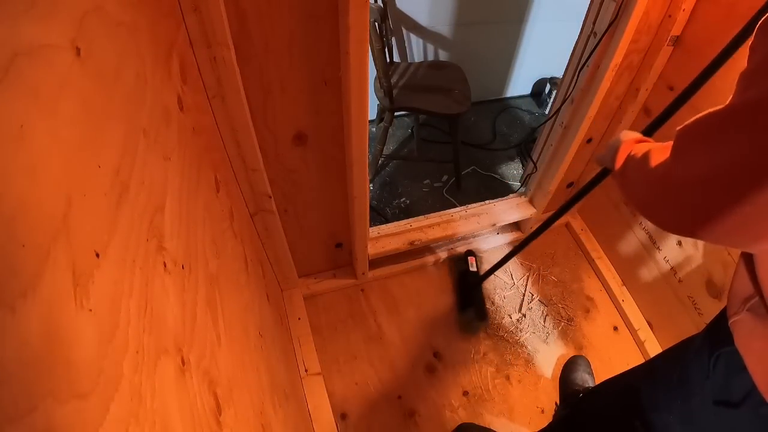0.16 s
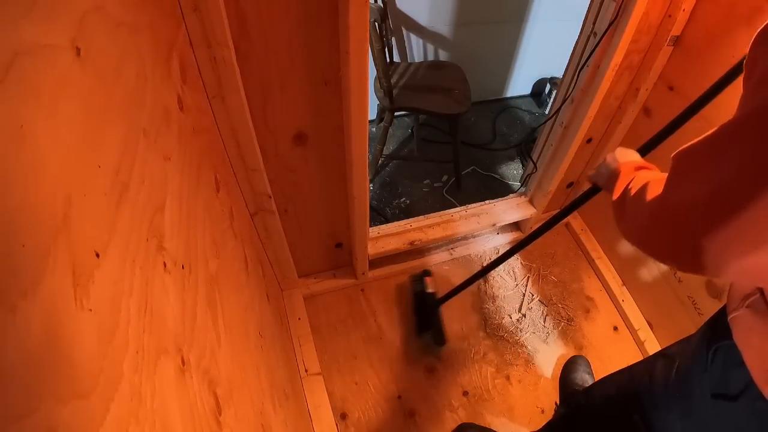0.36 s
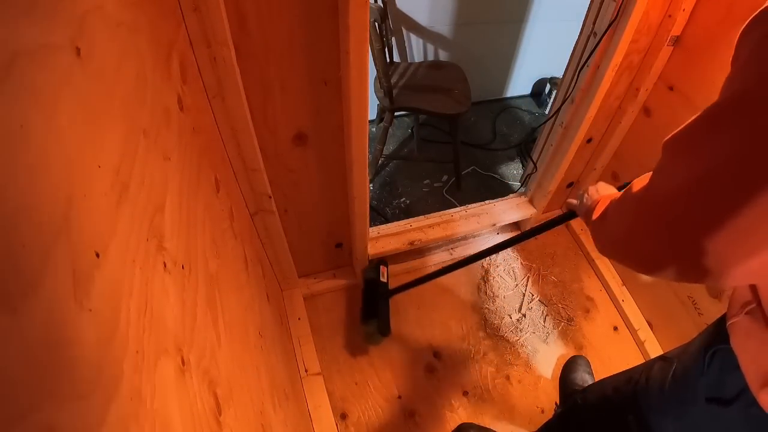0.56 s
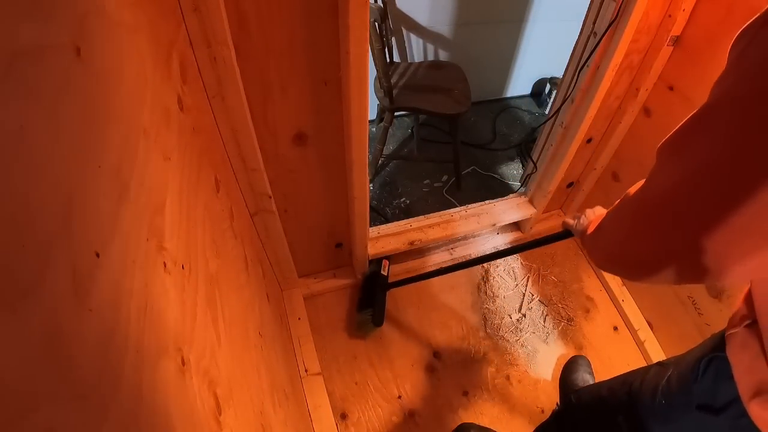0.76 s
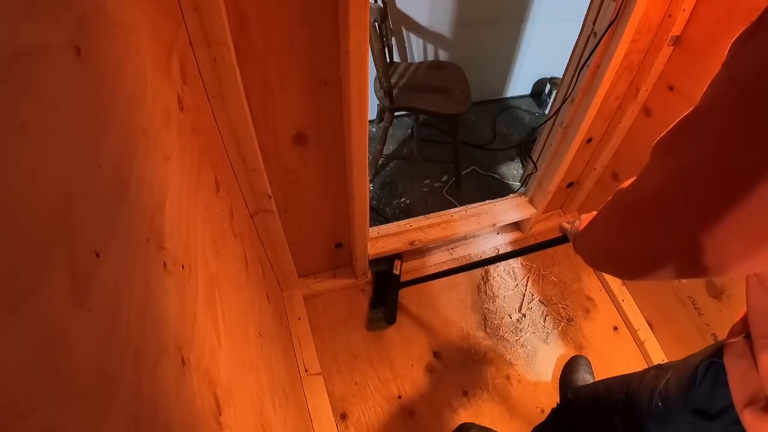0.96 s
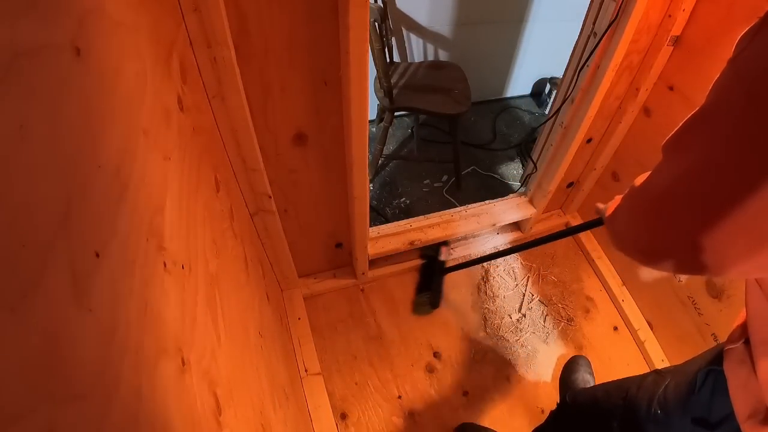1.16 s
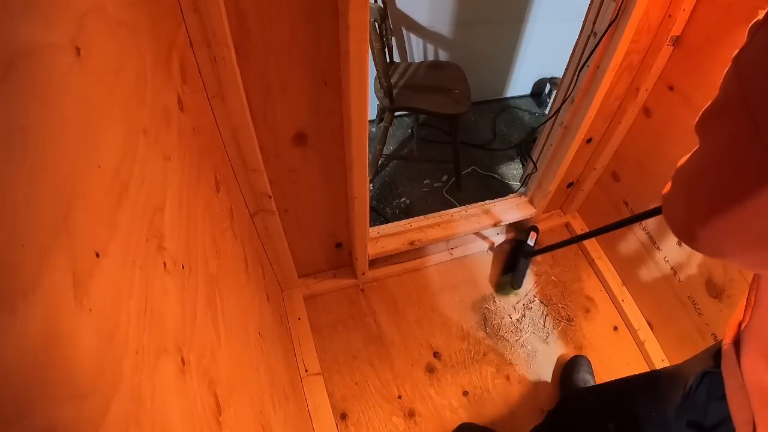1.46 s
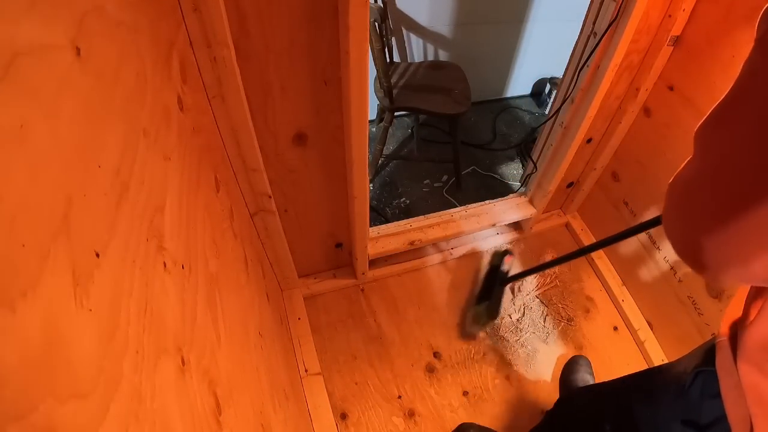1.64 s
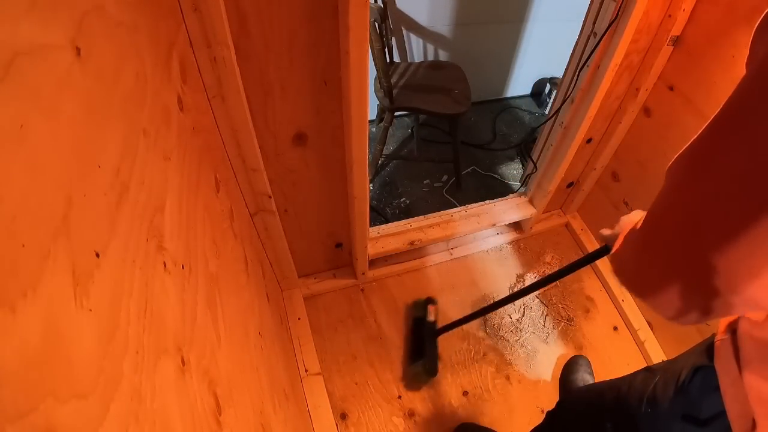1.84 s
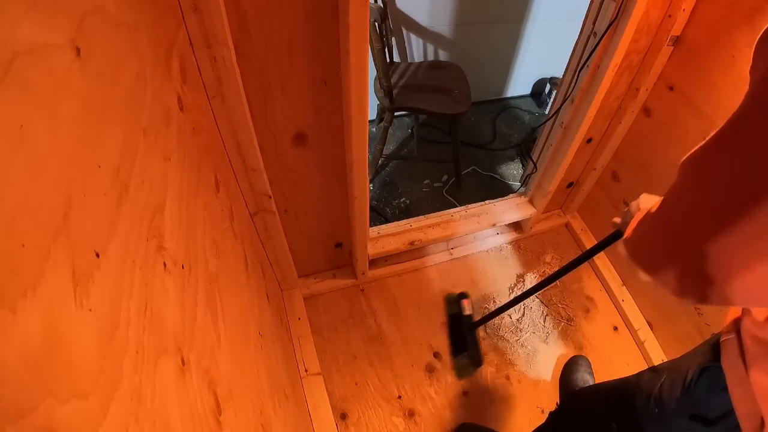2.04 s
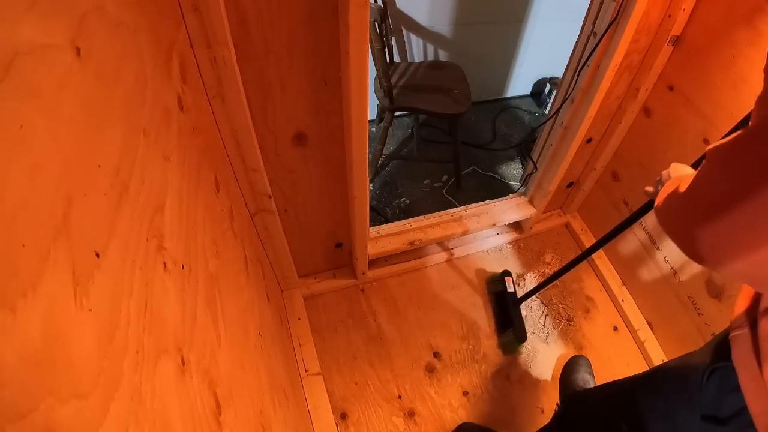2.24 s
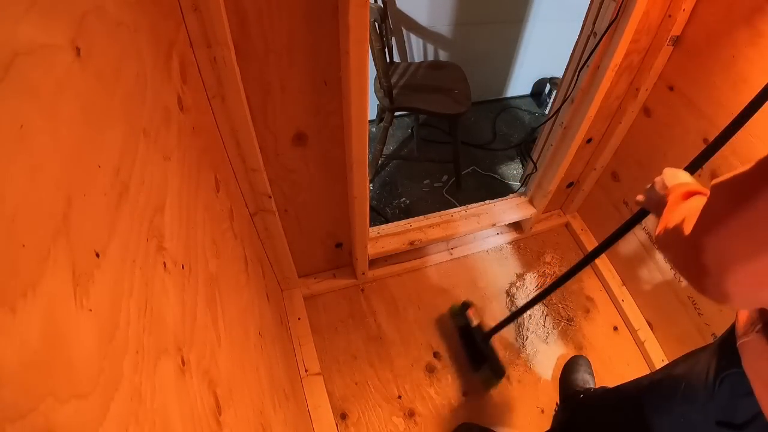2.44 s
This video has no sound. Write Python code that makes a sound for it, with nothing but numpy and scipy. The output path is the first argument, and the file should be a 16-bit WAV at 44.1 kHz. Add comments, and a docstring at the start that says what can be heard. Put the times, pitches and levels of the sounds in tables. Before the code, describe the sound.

A broom sweeps wood shavings over plywood in a small wooden shack. Its head knocks on the boards at the start, and a short, scratchy stroke follows until 0.5 seconds. A longer stroke hisses and crackles from 0.7 to 1.8 seconds, the hollow floor drumming along with soft, low thuds. At 2.1 seconds the bristles slap down with a knock, then a brighter stroke ends near 2.6 seconds.

```python
"""A small wooden shack, where a broom sweeps wood shavings over a plywood floor in three strokes.
Bristle tips hiss, shavings crackle, and tufts scrape on the grain and set the broom head ringing.
The head knocks on the boards and the hollow floor drums along; before the last stroke the bristles
slap down. Bare walls ring briefly after the brushing, over low thuds and a faint draught.
Below the top treble, the image starts nearly mono and opens out during the second stroke."""
import sys
import numpy as np
from scipy import signal
from scipy.fft import rfft, irfft
from scipy.io import wavfile

SR = 44100
rng = np.random.default_rng(int(sys.argv[2]) if len(sys.argv) > 2 else 0)


def digitize_waveform(pressure):
    """Quantize a signal to 16-bit integers and store it at the path in sys.argv[1].

    Rows of a 2-D input are taken as channels; values are limited to [-1, 1].
    """
    field = np.atleast_2d(pressure).T
    bounded = np.clip(field, -1, 1)
    quanta = np.round(bounded * 32767).astype(np.int16)
    wavfile.write(sys.argv[1], SR, quanta)


N = 114660
TIME = np.arange(N) / SR
CATCHES_PER_S, CATCH_SPREAD_DB = 4000, 2.5  # tufts snagging on the grain

# drag of the broom, one curve per stroke (time [s], scrape level [dB], floor drumming level [dB])
DRAG = [
    [(0.27, -49, -40.5), (0.326, -55, -47), (0.406, -68.5, -53), (0.49, -57, -56), (0.586, -102, -63),
     (0.592, -90, -63), (0.656, -93, -67), (0.66, -81.5, -68), (0.716, -100, -83), (0.72, -74, -80)],
    [(0.72, -69, -75), (0.748, -55.5, -63), (0.852, -59.5, -51.5), (0.962, -46.5, -46.5),
     (1.092, -44, -36.5), (1.172, -44.5, -38.5), (1.464, -44, -40), (1.766, -55, -44.5),
     (1.82, -69.5, -52.5), (2.02, -102, -67.5)],
    [(2.2, -49, -33), (2.212, -61, -37), (2.228, -43.5, -35.5), (2.248, -53, -38), (2.254, -47, -41.5),
     (2.322, -46.5, -43.5), (2.394, -56, -37.5), (2.414, -38.5, -42), (2.46, -51, -42), (2.54, -83, -53)],
]


def amp(db):
    """Decibels to gain."""
    return 10 ** (np.asarray(db) / 20)


def unit(x):
    """Scales to rms 1."""
    return x / np.sqrt(np.mean(x ** 2) + 1e-20)


def read(points, hz):
    """Reads a table on a log-frequency axis."""
    f, value = np.transpose(points)
    return np.interp(np.log(hz + 1), np.log(f), value)


def colour(x, eq):
    """Applies an EQ curve (frequency [Hz], gain [dB])."""
    size = 2 * len(x)
    hz = np.fft.rfftfreq(size, 1 / SR)
    return irfft(rfft(x, size) * amp(read(eq, hz)))[:len(x)]


def add(mix, start, sound):
    """Mixes a sound in at a start time in seconds."""
    part = mix[max(round(start * SR), 0):][:len(sound)]
    part += sound[:len(part)]


def noise(eq):
    """Coloured noise at rms 1."""
    return unit(colour(rng.standard_normal(N), eq))


def grains(per_s, spread_db):
    """A steady shower of tiny clicks, their sizes scattered by spread_db."""
    size = amp(spread_db * np.minimum(rng.exponential(1, N), 5))
    return size * rng.choice([-1, 1], N) * (rng.random(N) < per_s / SR)


def swells(events):
    """One envelope for all events: each rises in a straight line, then falls exponentially."""
    gain = np.zeros(N)
    for start, db, rise, t60 in events:
        t = TIME - start
        gain += np.clip(t / rise, 0, 1) * amp(db - 60 * np.maximum(t - rise, 0) / t60)
    return gain


def stroke_gain(curves, column, fade_db_per_s=702.5):
    """Joins one level column of all strokes; each fades quickly outside its span."""
    power = np.zeros(N)
    for curve in map(np.array, curves):
        outside_s = abs(TIME - np.clip(TIME, curve[0, 0], curve[-1, 0]))
        db = np.interp(TIME, curve[:, 0], curve[:, column])
        power += amp(db - fade_db_per_s * outside_s) ** 2
    return np.sqrt(power)


def tail(t60, eq):
    """A dense noise tail of energy 1; each band dies as t60 says (frequency [Hz], T60 [s])."""
    white = irfft(np.exp(2j * np.pi * rng.random(SR // 2 + 1)))
    hz, t, bands = signal.stft(colour(white, eq), SR, nperseg=256)
    decay = amp(-60 * t / read(t60, hz)[:, None])
    wash = signal.istft(bands * decay, SR)[1]
    return wash / np.linalg.norm(wash)


def shack(x):
    """Adds the short ring of bare wooden walls."""
    # decay of the walls' ring (frequency [Hz], T60 [s])
    room_t60 = [(100, 1), (1000, .3), (4000, .25), (14000, 0.05)]
    walls = tail(room_t60, eq=[(100, 1), (14000, -3.1)])
    return x + amp(-13) * signal.fftconvolve(x, walls)[:N]


def spread(x):
    """The image is always wide in the top treble; lower down it is nearly mono, widening after 1.1 s."""
    # side against mid, for the opening image and the ever-wide top (frequency [Hz], gain [dB])
    width = [(60, -35.5), (170, -25.5), (350, -25.5), (700, -10), (1400, -12.5), (2800, -11), (5500, -8.5),
             (9000, -4.5), (14000, -9.5)]
    top_width = [(7000, -64.5), (10000, -18.5), (12000, -3), (15000, -5)]
    # left against right, for the same two (frequency [Hz], balance [dB])
    lean = [(100, 0), (500, 1), (1500, 1), (6000, .9), (9500, 1.9), (13500, 1.5)]
    top_lean = [(10000, 0), (12500, -2.8)]
    # the image opening out (time [s], share of full width [0-1])
    opening = [(0.0, 0.0026), (1.12, 0.005), (1.35, 0.23), (1.65, .5), (1.9, 0.68), (2.3, 0.84)]
    decorrelator = tail(t60=[(100, .08), (14000, .06)], eq=[(100, 0.0063), (14000, 0.0088)])
    side = signal.fftconvolve(x, decorrelator)[:N]
    share = np.interp(TIME, *np.transpose(opening))
    channels = []
    for sign in (1, -1):
        wide = x + sign * colour(side, width)
        wide = colour(wide, [(hz, sign * db / 2) for hz, db in lean])
        heard = x + share * (wide - x) + sign * colour(side, top_width)
        channels.append(colour(heard, [(hz, sign * db / 2) for hz, db in top_lean]))
    return np.array(channels)


def still_air():
    """A faint, dark bed of room tone."""
    # tone of the still air (frequency [Hz], gain [dB])
    air_eq = [(20, -3), (55, -2), (110, -16), (200, -14), (700, -32), (3000, -30.5), (8000, -41),
              (15000, -68.5)]
    return amp(-61.5) * noise(air_eq)


def draught():
    """Air stirred by the swing of the broom rumbles faintly at the microphone."""
    # puffs of air (time [s], level [dB], rise [s], T60 [s])
    puffs = [(0.4, -43, 0.046, 0.97), (0.85, -45, 0.1, .7)]
    # their sub-bass tone (frequency [Hz], gain [dB])
    puff_eq = [(15, 0), (27, 5), (50, 2), (65, -14), (100, -21), (300, -69), (3000, -100)]
    return noise(puff_eq) * swells(puffs)


def thuds():
    """The floor gives soft, low thuds as weight shifts on it."""
    # shifts of weight (time [s], level [dB], rise [s], T60 [s])
    shifts = [(0.3, -39, 0.0086, 0.22), (0.418, -40, 0.036, 0.39), (0.609, -55, .02, 0.24),
              (1.138, -36, 0.031, 0.77), (1.61, -47, .02, 0.14), (1.74, -43, 0.023, .15),
              (2.198, -37.5, 0.01, 0.82), (2.442, -45, 0.021, 0.1)]
    # their bassy tone (frequency [Hz], gain [dB])
    thud_eq = [(20, -15), (50, -9), (85, 4), (115, 0), (170, -16.5), (300, -36), (1000, -109), (8000, -100)]
    return noise(thud_eq) * swells(shifts)


def floor_ring():
    """The plywood rings after one tap, each mode at a random phase."""
    # modes of the floor (frequency [Hz], level [dB], T60 [s])
    modes = [(77.95, -8, .6), (95.1, -13.5, 0.3), (175.5, 0, 0.41), (199.6, -2, .35), (230, -14, .25),
             (262, -12.5, 0.51), (304.4, -5, 0.62), (347.9, -1, 0.32), (402, -14, 0.42), (454, -2, 0.18),
             (516, -15.5, 0.73), (594.4, -4.5, .33), (729, -13, 0.34), (824, -16, 0.19)]
    t = TIME[:SR]
    return sum(amp(db - 60 * t / t60) * np.sin(2 * np.pi * (hz * t + rng.random()))
               for hz, db, t60 in modes)


def drumming():
    """The dragging bristles shake the hollow floor, harder where the head judders."""
    # the head judders over the boards (time [s], level [dB], rise [s], T60 [s])
    judders = [(1.055, -36, 0.029, 0.26), (1.572, -36, 0.013, 0.19), (1.7, -37, .055, .15),
               (2.025, -57, .02, 0.08)]
    # body of the floor and of the judder (frequency [Hz], gain [dB])
    drum_eq = [(30, 2), (90, -11), (140, -3), (180, -3), (250, -0.5), (320, -2), (430, 0), (520, -15.5),
               (680, -13.5), (900, -48), (3000, -64)]
    judder_eq = [(100, -19), (200, 1), (250, -9.5), (295, 9), (350, -6.5), (390, -23), (440, -2),
                 (520, -21), (1500, -56), (12000, -85)]
    push = unit(grains(CATCHES_PER_S, CATCH_SPREAD_DB))
    ring = unit(signal.fftconvolve(push, floor_ring())[:N])
    drum = unit(unit(colour(push, drum_eq)) + 0.97 * unit(colour(ring, drum_eq)))
    judder = unit(colour(grains(per_s=970, spread_db=2), judder_eq))
    return amp(-2) * drum * stroke_gain(DRAG, column=2) + judder * swells(judders)


def knocks(contact_s=.0003):
    """The head strikes the boards: a short clack, the floor's modes and the boom of the shack."""
    # blows of the head (time [s], level [dB], low-pass [Hz], damping by the bristles [dB/s])
    blows = [(0.0005, -11, 900, 99.5), (0.0094, 1.5, 1620, 3), (0.05, -7.5, 530, 6), (0.082, -5, 292, -8),
             (1.072, -22, 900, 48), (2.096, -8.5, 384, 145), (2.117, -6, 290, 140), (2.556, -28.5, 900, 26),
             (2.576, -19.5, 550, 33)]
    # clack at the point of contact (frequency [Hz], level [dB], T60 [s])
    clack_modes = [(230, 0, .05), (450, 2, .03), (780, 0, .014), (1400, -1, .009)]
    # tone of the boom (frequency [Hz], gain [dB])
    boom_eq = [(30, -18), (80, 0), (130, 1.5), (200, 4.5), (250, -2), (430, -1), (680, -5), (1000, -15),
               (1700, -22), (2500, -34), (4500, -27), (12000, -26.5)]
    # decay of the boom (frequency [Hz], T60 [s])
    boom_t60 = [(60, 0.78), (200, 0.52), (500, 0.39), (1000, 0.49), (3000, .25), (12000, 0.096)]
    mix, t = np.zeros(N), TIME[:SR]
    clack = sum(amp(db - 60 * t / t60) * np.sin(2 * np.pi * hz * t) for hz, db, t60 in clack_modes)
    clack *= amp(-9) * (1 - np.exp(-t / contact_s))
    for start, db, lowpass_hz, damping in blows:
        boards = amp(-15.5) * floor_ring()
        boom = amp(16.5) * tail(boom_t60, boom_eq)[:SR]
        blow = signal.lfilter(*signal.butter(2, lowpass_hz, fs=SR), clack + boards + boom)
        add(mix, start, amp(db - 1 - damping * t) * blow)
    return mix


def slaps(lead_db=-18.5, lead_s=0.0062):
    """A few bristles touch first, then the whole bundle lands in a burst of clicks."""
    # the bundle lands (time [s], level [dB], rise [s], T60 [s])
    landings = [(-0.006, -33.5, 0.0084, .07), (2.08, -23, 0.015, 0.21)]
    # tone of the slap (frequency [Hz], gain [dB])
    slap_eq = [(100, -3), (550, -1), (1250, 1.5), (1500, -4), (1950, 0), (3000, -6.5), (5000, -10),
               (7000, -19), (10000, -32), (15000, -43.5)]
    burst = unit(colour(grains(per_s=6400, spread_db=0), slap_eq))
    first_touch = sum(amp(db + lead_db) * np.exp(-abs(TIME - start) / lead_s)
                      for start, db, _, _ in landings)
    return burst * (first_touch + swells(landings))


def scraping():
    """Tufts catch on the grain and let go; where they bite, the hollow head rings."""
    # midrange rasp of the scrape (frequency [Hz], gain [dB])
    scrape_eq = [(250, -39.5), (450, -4.5), (600, 1.5), (740, 1), (870, -5), (1050, -2.5), (1300, -4),
                 (1750, -9), (2400, -10.5), (5000, -24.5), (9000, -42), (15000, -72)]
    # resonances of the broom head (frequency [Hz], bandwidth [Hz], level [dB])
    head_modes = [(600, 29, -8), (718, 19, -5), (819, 110, -7.5), (962, 47, -15), (1235, 240, -13.5),
                  (1676, 270, -8)]
    # the bristles bite (time [s], level [dB], rise [s], T60 [s])
    bites = [(0.08, -43.5, .06, 0.56), (0.728, -65.5, 0.018, 0.23), (0.81, -49.5, 0.06, 0.45),
             (0.92, -48.5, 0.058, 0.77), (1.04, -44, 0.034, 0.18), (1.27, -47.5, 0.055, 0.44),
             (2.13, -43, 0.036, .5), (2.4, -48.5, 0.016, 0.21), (2.556, -45, 0.031, .4)]
    catches = grains(CATCHES_PER_S, CATCH_SPREAD_DB)
    scrape = amp(-3) * unit(colour(catches, scrape_eq)) * stroke_gain(DRAG, column=1)
    ring = sum(amp(db) * signal.lfilter(*signal.iirpeak(hz, hz / width, SR), catches)
               for hz, width, db in head_modes)
    return scrape + unit(colour(ring, scrape_eq)) * swells(bites)


def bristles(hard_stroke_db=-42.5):
    """Thousands of tips flick over the wood, brighter when pushed hard; shavings crackle among them."""
    # envelope of the hiss, one curve per stroke (time [s], level [dB])
    strokes = [
        [(0.03, -61), (0.062, -58), (0.118, -48.5), (0.33, -51.5), (0.392, -66), (0.44, -67.5), (0.476, -66),
         (0.54, -75.5), (0.554, -87), (0.636, -87), (0.656, -68.5), (0.72, -83)],
        [(0.72, -79.5), (0.742, -71), (0.956, -57), (0.986, -51), (1.042, -56), (1.086, -50), (1.148, -58.5),
         (1.204, -51), (1.456, -44.5), (1.622, -49), (1.808, -71.5), (2.05, -81.5)],
        [(2.15, -45), (2.368, -41.5), (2.436, -46), (2.556, -74), (2.6, -59)],
    ]
    # tone of the hiss and crackle, and of the sizzle on top (frequency [Hz], gain [dB])
    hiss_eq = [(300, -24), (1200, -1), (2300, -1), (4200, 0), (7300, -6), (10500, -15.5), (12500, -21.5),
               (15500, -30)]
    sizzle_eq = [(5000, -43), (9000, -13.5), (11000, -0.5), (12800, 2), (15500, -6)]
    level = stroke_gain(strokes, column=1)
    hiss = amp(0.5) * unit(colour(grains(per_s=14000, spread_db=2), hiss_eq))
    shavings = amp(-10.5) * unit(colour(grains(per_s=650, spread_db=5), hiss_eq))
    sizzle = amp(-60) * unit(colour(grains(per_s=14000, spread_db=2), sizzle_eq))
    hardness = (level / amp(hard_stroke_db)) ** 2.5  # the top treble grows faster than the hiss
    return (hiss + shavings) * level + sizzle * hardness


def scene():
    """The brushing with its wall reflections, over floor and air, spread to stereo."""
    air = still_air()
    brushing = shack(bristles() + scraping() + slaps())
    return spread(brushing + drumming() + knocks() + thuds() + draught() + air)


def record(dry, cutoff_hz=15650):
    """A steep low-pass trims the very top."""
    lowpass = signal.firwin(511, cutoff_hz, window=("kaiser", 9), fs=SR)
    return signal.oaconvolve(dry, lowpass[None], "same")


dry = scene()
out = record(dry)
digitize_waveform(out)
```